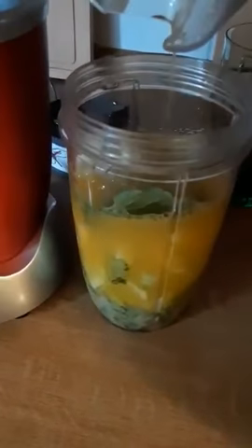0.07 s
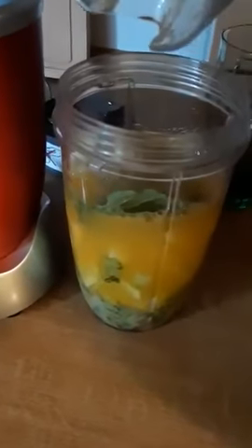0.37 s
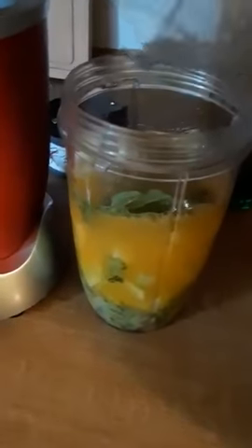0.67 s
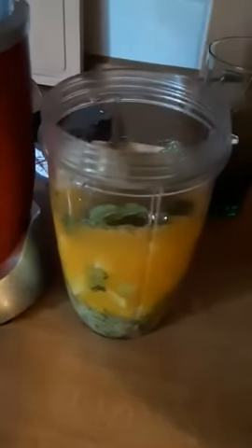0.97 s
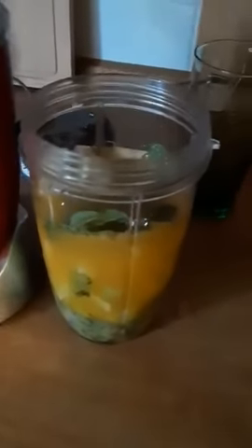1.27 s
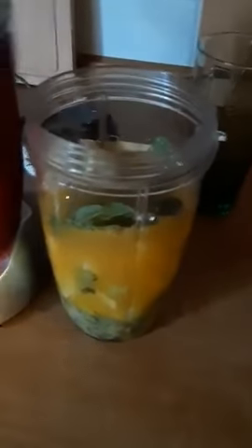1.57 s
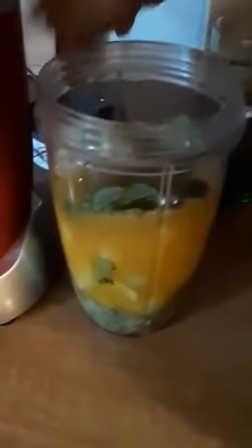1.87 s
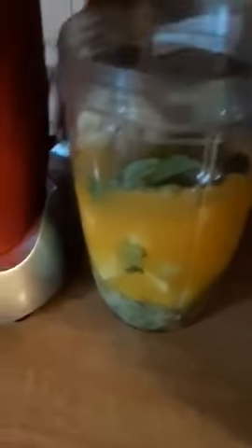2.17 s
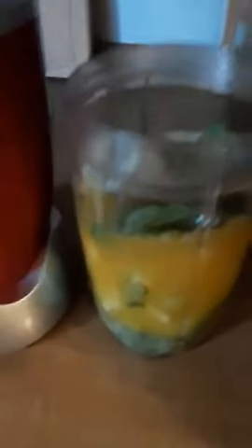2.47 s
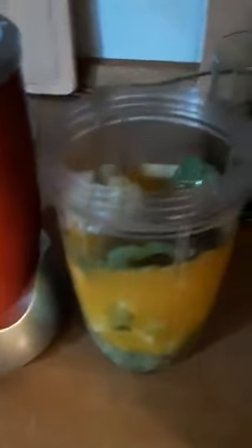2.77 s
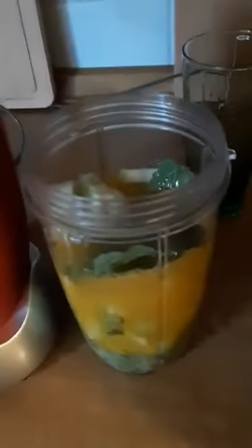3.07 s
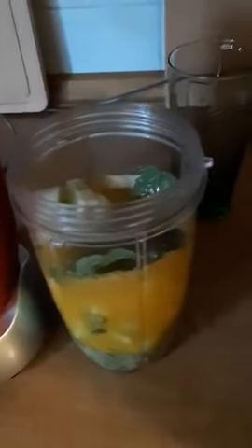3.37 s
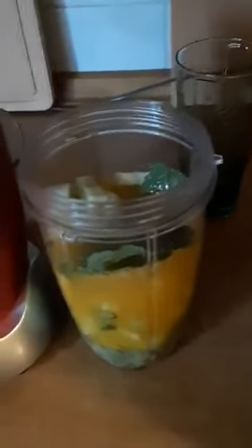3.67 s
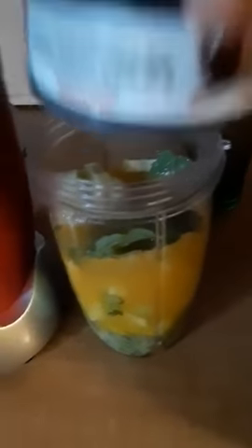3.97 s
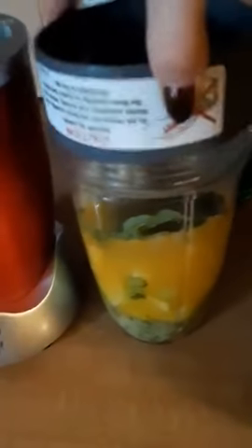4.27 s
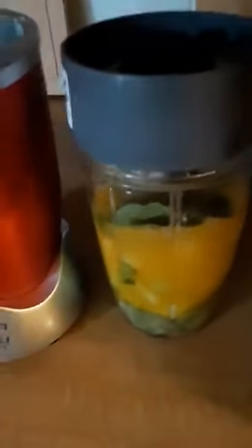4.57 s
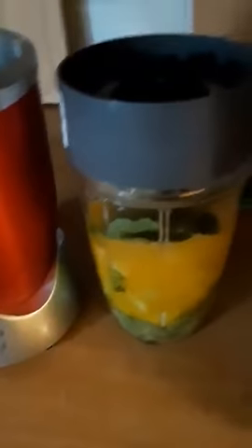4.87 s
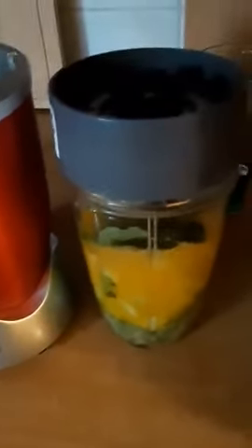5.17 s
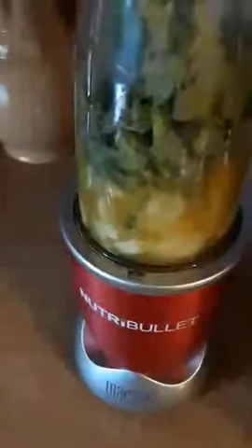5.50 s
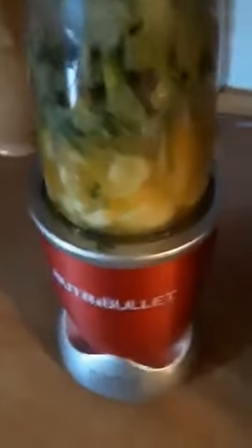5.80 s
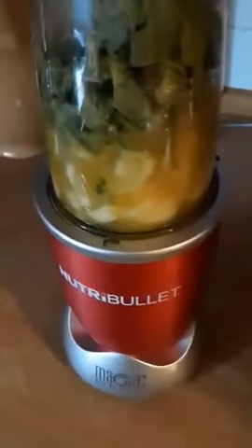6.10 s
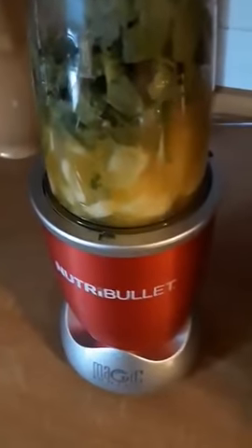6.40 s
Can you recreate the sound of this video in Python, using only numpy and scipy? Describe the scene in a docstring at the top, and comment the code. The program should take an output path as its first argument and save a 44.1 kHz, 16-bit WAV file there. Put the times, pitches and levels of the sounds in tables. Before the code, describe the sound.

A hollow plastic cup clunks down, then a blender's blade base clacks onto it in a small room, motor off.

```python
"""Kitchen worktop: hard plastic blender parts are handled, motor off.
A hollow cup clunks down and rattles to rest, the blade base knocks onto the rim and seats with a thud,
small parts click and rub. Each knock clacks the plastic wall, rings the cup and thumps the worktop.
A small hard room answers over a low mains hum."""
import sys
import numpy as np
from scipy import signal
from scipy.fft import rfft, irfft
from scipy.io import wavfile
from scipy.ndimage import uniform_filter1d

SR = 44100
rng = np.random.default_rng(int(sys.argv[2]) if len(sys.argv) > 2 else 0)


def to_wav(s):
    """Save 16-bit WAV."""
    ch = np.atleast_2d(s).T  # columns
    pcm = np.round(np.clip(ch, -1, 1) * 32767)  # PCM
    wavfile.write(sys.argv[1], SR, pcm.astype(np.int16))


N = 284004

# Stereo width. Each row: frequency in Hz, side against mid in dB.
WIDTH_DB = [(60, -21), (150, -17), (330, -10.5), (700, -3), (1300, 2), (12000, -1.5)]


def amp(db):
    """Decibels to gain."""
    return 10 ** (np.asarray(db) / 20)


def unit(x):
    """Scales to rms 1."""
    return x / np.sqrt(np.mean(x ** 2) + 1e-20)


def read(points, hz):
    """Interpolates a table on a log-frequency axis."""
    f, value = np.transpose(points)
    return np.interp(np.log(hz + 1), np.log(f + 1), value)


def add(mix, start_s, sound):
    """Mixes a sound into both channels."""
    part = mix[:, max(round(start_s * SR), 0):][:, :sound.shape[1]]
    part += sound[:, :part.shape[1]]


def freqs(size):
    """FFT bin frequencies in Hz."""
    return np.fft.rfftfreq(size, 1 / SR)


def band(hz, low_hz, high_hz):
    """Band-pass gain with rounded edges."""
    return 1 / np.sqrt((1 + (low_hz / (hz + 1)) ** 8) * (1 + (hz / high_hz) ** 8))


def noise(gain):
    """Shaped stereo noise, rms 1; long waves reach both microphones alike."""
    size = 2 * (len(gain) - 1)
    width = amp(read(WIDTH_DB, freqs(size)))
    mid, side = rfft(rng.standard_normal((2, size))) * gain
    side = side * width
    return unit(irfft(np.array([mid + side, mid - side]) / np.sqrt(1 + width ** 2)))


def onset(x, rise_s):
    """Exponential attack."""
    return x * (1 - np.exp(-np.arange(x.shape[1]) / SR / rise_s))


def die_away(x, t60_table, bands=8):
    """Decays each band at its own rate."""
    size = x.shape[1]
    t, spectrum = np.arange(size) / SR, rfft(x)
    centres_hz = np.geomspace(100, 12800, bands)
    shares = [read(list(zip(centres_hz, row)), freqs(size)) for row in np.eye(bands)]
    return sum(irfft(spectrum * share) * np.exp(-np.log(1000) * t / read(t60_table, hz))
               for hz, share in zip(centres_hz, shares))


def ripple(hz, spacing_hz):
    """Crowded modes bunch into spectral peaks and gaps, fading out in the bass."""
    heights = rng.standard_normal(400)
    peaks = unit(np.interp(hz / spacing_hz, np.arange(len(heights)), heights))
    return peaks * hz ** 2 / (hz ** 2 + 1500 ** 2)


def background(waver=0.0055, air_db=-79, rumble_db=-72):
    """Wavering appliance hum, faint room air and rumble; all dip and swell together."""
    # Hum partials. Each row: frequency in Hz, rms level before the swell in dB.
    partials = [(48.4, -57.5), (96.9, -86), (285.3, -88.5), (403.7, -87.5), (538.3, -90), (646.0, -103)]
    # Air spectrum. Each row: frequency in Hz, relative density in dB.
    air_shape = [(65, -32.5), (110, -12.5), (221, -14), (536, -18), (594, -17.5), (8610, -30.5),
                 (12500, -28.5), (15000, -56)]
    # Slow swell. Each row: time in seconds, gain in dB.
    swell = [(0, 0), (1.4, 0), (2.0, -1), (2.5, -4), (2.9, -3), (3.2, 0), (5.4, 0), (5.9, 2), (6.44, 1)]
    t = np.arange(N) / SR
    drift = np.interp(t, np.linspace(0, t[-1], 40), rng.standard_normal(40))
    clock_s = np.cumsum(1 + waver * drift) / SR
    hum = sum(np.sqrt(2) * amp(db) * np.sin(2 * np.pi * (hz * clock_s + rng.random()))
              for hz, db in partials)
    air = amp(air_db) * noise(amp(read(air_shape, freqs(N))))
    rumble = amp(rumble_db) * noise(band(freqs(N), low_hz=45, high_hz=102))
    return (hum + air + rumble) * amp(np.interp(t, *np.transpose(swell)))


def rubs(grain_db=4, size=16384):
    """Sliding surfaces: swells of friction noise broken into tiny slips."""
    # Each row: start in seconds, length in seconds, level in dB, low and high edge in Hz.
    strokes = [(0.0, .055, -63.5, 2980, 11300), (0.1, .05, -67.5, 3180, 6950),
               (0.317, .066, -71, 5060, 8650), (0.999, .052, -51, 1310, 7000),
               (1.879, .3, -63.5, 900, 6400), (2.253, 0.061, -68.5, 1200, 8030),
               (2.737, 0.23, -60, 3770, 8200), (2.716, 0.31, -63.5, 350, 2443),
               (3.201, .083, -59, 3900, 7300), (3.373, 0.088, -56, 3510, 7200),
               (3.384, 0.21, -65, 964, 2900), (4.519, .016, -27, 1510, 9720),
               (4.564, .046, -45.5, 2980, 12140), (5.734, 0.044, -48.5, 891, 7500),
               (6.336, .22, -66.5, 229.5, 700)]
    out, t = np.zeros((2, N)), np.arange(size) / SR
    for start_s, length_s, db, low_hz, high_hz in strokes:
        roughness = unit(uniform_filter1d(rng.standard_normal(size), size=130))
        slips = unit(amp(grain_db * roughness))
        swell = np.sin(np.pi * np.minimum(t / length_s, 1))
        gain = band(freqs(size), low_hz, high_hz)
        friction = unit(irfft(rfft(noise(gain) * slips) * np.sqrt(gain)))
        add(out, start_s, amp(db) * swell * friction)
    return out


def clicks(ripple_db=2.2, size=4096):
    """Hard edges snap past each other and ring briefly."""
    # Each row: start in seconds, level in dB, low and high edge in Hz.
    snaps = [(0.134, -56, 800, 8000), (0.367, -62.5, 3000, 12000), (1.013, -45.5, 1400, 6440),
             (1.264, -64, 4600, 8500), (1.468, -20, 4978, 13000), (2.922, -37, 3370, 7210),
             (3.046, -18, 1190, 11500), (3.345, -52, 3440, 9180), (3.511, -39, 890, 2380),
             (3.517, -50, 400, 8500), (3.787, -63.5, 3000, 8040), (4.392, -28.5, 2200, 10000),
             (4.4194, -20.5, 1390, 9000), (4.5267, -12, 1400, 2380), (5.786, -41, 702, 11100),
             (5.843, -52, 900, 1840), (6.299, -67.5, 5490, 8030)]
    # Spectrum of the edges. Each row: frequency in Hz, relative density in dB.
    edge_shape = [(300, -10.5), (1200, -2), (2000, -3.5), (3000, -7), (3450, -14), (3950, 3), (5300, 2.5),
                  (5900, -11), (6700, 1), (7600, 0), (9000, -7.5), (12000, -4), (15000, -7)]
    # Their decay. Each row: frequency in Hz, T60 in seconds.
    edge_t60 = [(500, .03), (2000, 0.034), (5000, 0.021), (12000, 0.039)]
    out, hz = np.zeros((2, N)), freqs(size)
    for start_s, db, low_hz, high_hz in snaps:
        shape_db = read(edge_shape, hz) + ripple_db * ripple(hz, spacing_hz=330)
        tick = noise(amp(shape_db) * band(hz, low_hz, high_hz))
        add(out, start_s, amp(db) * onset(die_away(tick, edge_t60), rise_s=0.0004))
    return out


def chatter(count, length_s, last_db, spread=1.3, last_brightness=0.75):
    """Contacts of one knock, ever wider apart and duller: delay in s, gain in dB, brightness ratio."""
    progress = np.linspace(0, 1, round(count))
    return zip(length_s * progress ** spread, last_db * progress ** 2, last_brightness ** progress)


def contact(hz, low_hz, high_hz):
    """A blow near a stiff edge misses the low modes; a soft one misses the high ones."""
    return 1 / np.sqrt((1 + (low_hz / (hz + 1)) ** 6) * (1 + (hz / high_hz) ** 3.8))


def ring(modes, low_hz, high_hz, detune=0.005, scatter_db=1.5, size=24000):
    """Damped modes; at each blow the grip detunes them and the contact point varies their strength."""
    hz, db, t60_s = np.transpose(modes)[:, :, None]
    t = np.arange(size) / SR
    scatter, grip, place = rng.standard_normal((3, len(hz), 1))
    hz = hz * (1 + detune * grip)
    strength = amp(db + scatter_db * scatter) * contact(hz, low_hz, high_hz)
    waves = strength * np.exp((2j * np.pi * hz - np.log(1000) / t60_s) * t)
    # Short waves reach the two microphones out of step.
    skew_rad = (np.arctan(amp(read(WIDTH_DB, hz))) * place)[:, 0]
    return (np.exp(1j * np.array([skew_rad, -skew_rad])) @ waves).imag


def knocks(ripple_db=3.5, size=8192):
    """Each contact clacks the plastic wall, rings the hollow cup and thumps the worktop."""
    # Each row: start in seconds, contact count, chatter length in seconds, clack in dB, ring and thump
    # in dB re clack, last contact in dB re first, low edge in Hz, first contact's high edge in Hz.
    blows = [(0.8053, 2, 0.014, -22, -21.5, -3, -7.5, 200, 7000), (0.904, 1, 0, -46.5, -3, 8, 0, 200, 4000),
             (1.4689, 4, .0354, -9.5, -5, -19.5, -14.5, 536, 2600),
             (1.583, 3, .0085, -11.5, -5.5, -23, -0.5, 369, 2900),
             (1.618, 7, 0.058, -14, -4, -34.5, -7, 449.5, 2182),
             (2.184, 1, 0, -36, -12, -11, 0, 397.4, 2100), (2.257, 2, 0.012, -43, -34, -8, -15, 296, 1400),
             (2.837, 1, 0, -57.5, -3, 5.5, 0, 193, 500), (3.048, 1, 0, -53.5, -14.5, 2, 0, 198, 700),
             (4.2552, 3, 0.026, -29.5, -13, -6.5, 7, 291, 2100), (4.305, 1, 0, -29, -9, 0.5, 0, 400, 800),
             (4.39, 1, 0, -30.5, -23, -3, 0, 200, 4000),
             (4.409, 2, .0093, -24.5, -37, -1.5, -2.5, 144, 8000),
             (4.5234, 3, .0225, -22, -12, 2, -11, 121, 4200),
             (4.591, 2, .006, -26.5, -12, 2, -7, 120, 5000), (4.653, 1, 0, -36.5, -25, 9, 0, 120, 500),
             (5.738, 2, 0.0026, -50.5, -20, -2, 0, 148.3, 1200),
             (5.842, 1, 0.0029, -58, -13, -2, -4, 151, 249)]
    # Dense, short-lived wall modes. Each row: frequency in Hz, relative density in dB.
    wall_shape = [(100, -20), (250, -3), (450, -7), (800, 4), (1150, -8.5), (1480, -8), (1730, -16.5),
                  (2050, -11.5), (2700, -14), (4000, -9.5), (6000, -18), (8000, -16), (12000, -19.5),
                  (15000, -34)]
    # Their decay. Each row: frequency in Hz, T60 in seconds.
    wall_t60 = [(200, 0.37), (800, 0.048), (1600, 0.14), (4000, 0.057), (12000, 0.15)]
    # Cup and worktop modes. Each row: frequency in Hz, relative level in dB, T60 in seconds.
    cup_modes = [(321, -7, .2), (358, -10, .18), (434, 2, .2), (489, -4, .14), (519, -4, .16),
                 (594, -5, .18), (688, -3, .2), (745, -4, .14), (780, -3, .22), (854, -4, .18),
                 (927, -7, .16), (1010, -9, .14), (1385, -5, .1), (1413, -7, .1), (1473, -9, .1),
                 (1530, -6, .12), (2035, -12, .08), (2500, -13, .07), (2815, -13, .07), (3101, -11, .06),
                 (3289, -11, .06), (3500, -11, .06), (3962, -10, .05), (4549, -10, .05)]
    worktop_modes = [(74, -10, .2), (87, -2, .26), (121, -8, .2), (138, -6, .24), (219, -10, .18),
                     (247, -8, .22), (288, -9, .15), (339, -6, .15), (451, -9, .2)]
    out, hz = np.zeros((2, N)), freqs(size)
    wall_db = read(wall_shape, hz) + ripple_db * ripple(hz, spacing_hz=120)
    for start_s, count, length_s, clack_db, ring_db, thump_db, last_db, low_hz, first_hz in blows:
        for delay_s, db, brightness in chatter(count, length_s, last_db):
            force, high_hz = amp(clack_db + db), first_hz * brightness
            wall = noise(amp(wall_db) * contact(hz, low_hz, high_hz))
            clack = onset(die_away(wall, wall_t60), rise_s=0.00055)
            cup = amp(ring_db) * onset(ring(cup_modes, low_hz, high_hz), rise_s=0.0015)
            thump = amp(thump_db) * onset(ring(worktop_modes, 0, high_hz), rise_s=0.0048)
            for sound in (clack, cup, thump):
                add(out, start_s + delay_s, force * sound)
    return out


def hand_bumps():
    """Soft bumps of the hand: a few low cycles, alike in both microphones."""
    # Each row: start in seconds, length in seconds, level in dB, frequency in Hz.
    bumps = [(2.804, 0.05, -42.5, 69.6), (5.835, .025, -49, 157)]
    out = np.zeros((2, N))
    for start_s, length_s, db, hz in bumps:
        t = np.arange(0, length_s, 1 / SR)
        swell = np.sin(np.pi * t / length_s)
        add(out, start_s, amp(db) * swell * np.sin(2 * np.pi * hz * t)[None])
    return out


def echo(x, size=32768):
    """Diffuse echo that builds within milliseconds and differs between the microphones."""
    # Room decay. Each row: frequency in Hz, T60 in seconds.
    room_t60 = [(100, 0.5), (300, 0.58), (800, 0.6169), (2000, 0.6951), (5000, 0.34), (12000, 0.58)]
    # Room colour. Each row: frequency in Hz, echo gain in dB.
    room_db = [(80, -7), (250, -1), (700, -10), (2000, -9.5), (5000, -6), (12000, -11)]
    hz, t = freqs(size), np.arange(size) / SR
    decay = die_away(rng.standard_normal((2, size)), room_t60)
    spectrum = rfft(onset(decay, rise_s=0.0025))
    smooth_power = uniform_filter1d(abs(spectrum) ** 2, size=90, axis=1)
    spectrum *= amp(read(room_db, hz)) / np.sqrt(smooth_power + 1e-9)
    spectrum[1] *= amp(read(WIDTH_DB, hz))
    end_fade = np.clip(4 * (1 - t / t[-1]), 0, 1) ** 4
    mid, side = signal.fftconvolve(x, irfft(spectrum) * end_fade, axes=1)[:, :N]
    return np.array([mid + side, mid - side]) / np.sqrt(2)


def kitchen(x, crossfade_hz=4):
    """Small hard room echo, crossfaded between two diffuse tails so its colour keeps varying."""
    crossfade_rad = 2 * np.pi * crossfade_hz * np.arange(N) / SR
    return echo(x * np.cos(crossfade_rad)) + echo(x * np.sin(crossfade_rad))


def scene(click_send_db=-1, rub_send_db=-7):
    """Handling noises and their echo over the hum."""
    blows, ticks, slides = knocks(), clicks(), rubs()
    room = kitchen(blows + amp(click_send_db) * ticks + amp(rub_send_db) * slides)
    return blows + ticks + slides + hand_bumps() + room + background()


def record(dry, cutoff_hz=15200):
    """Microphone colour, full-scale clip and low-pass."""
    # Each row: frequency in Hz, gain in dB.
    microphone_db = [(20, -10), (45, 0), (7600, 0), (8400, -7), (9700, -6), (10600, -1), (12000, -1),
                     (12700, 3), (13400, -7), (15000, -16)]
    coloured = irfft(rfft(dry) * amp(read(microphone_db, freqs(N))), N)
    low_pass = signal.firwin(255, cutoff_hz, window=("kaiser", 9), fs=SR)
    return signal.oaconvolve(np.clip(coloured, -1, 1), low_pass[None], "same", axes=1)


dry = scene()
out = record(dry)
to_wav(out)
```